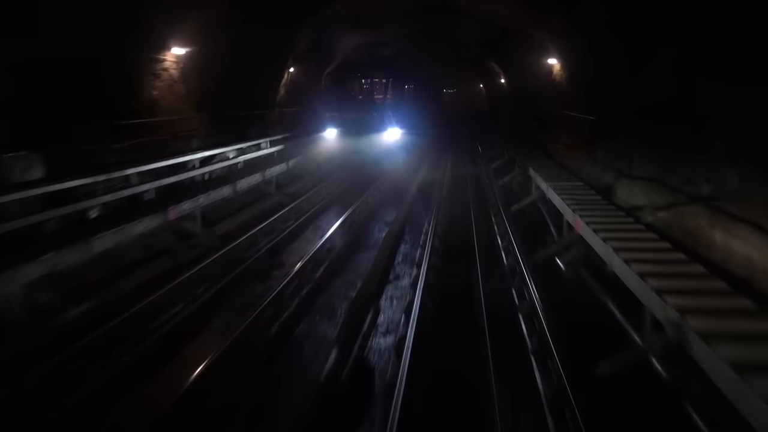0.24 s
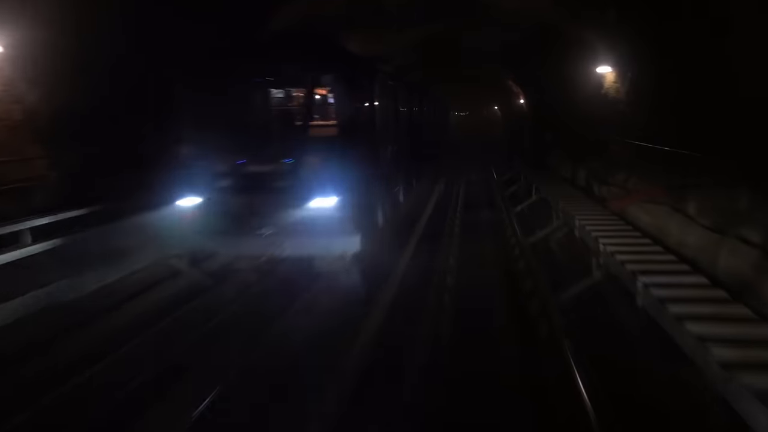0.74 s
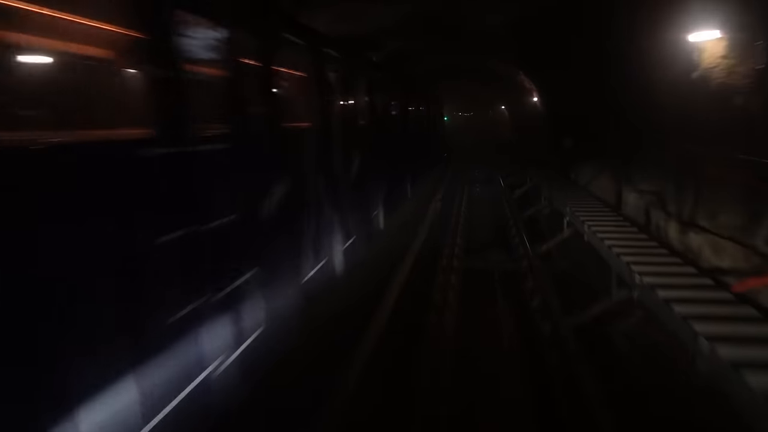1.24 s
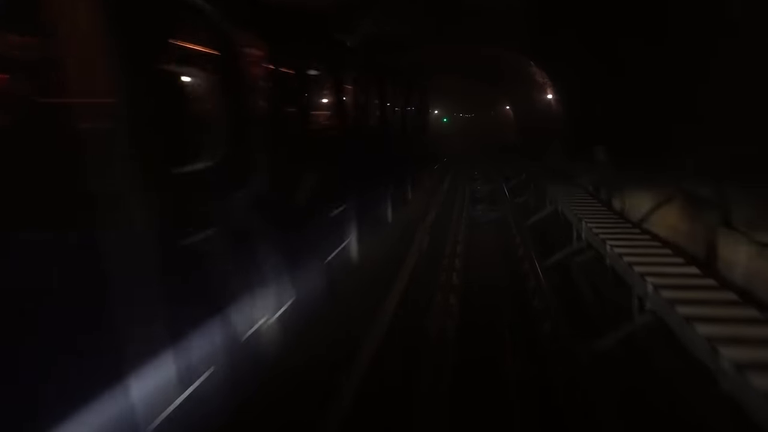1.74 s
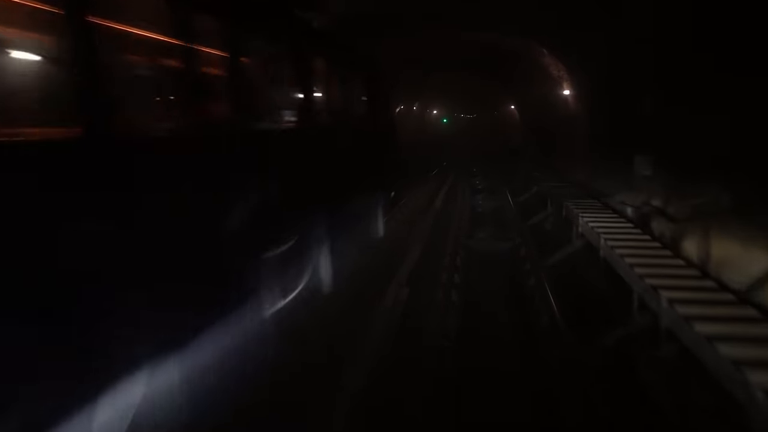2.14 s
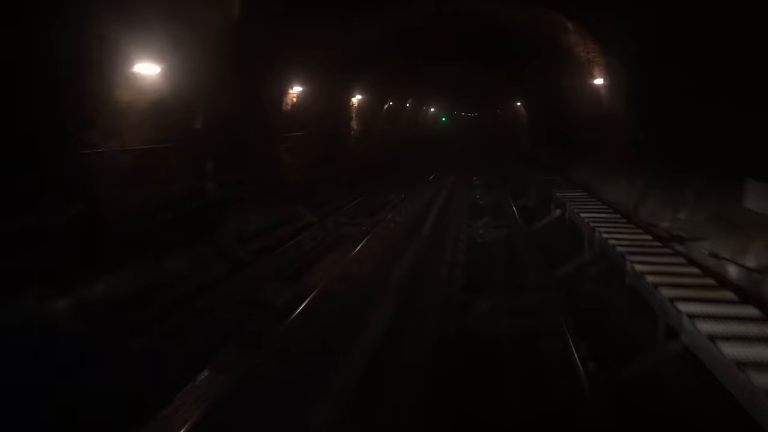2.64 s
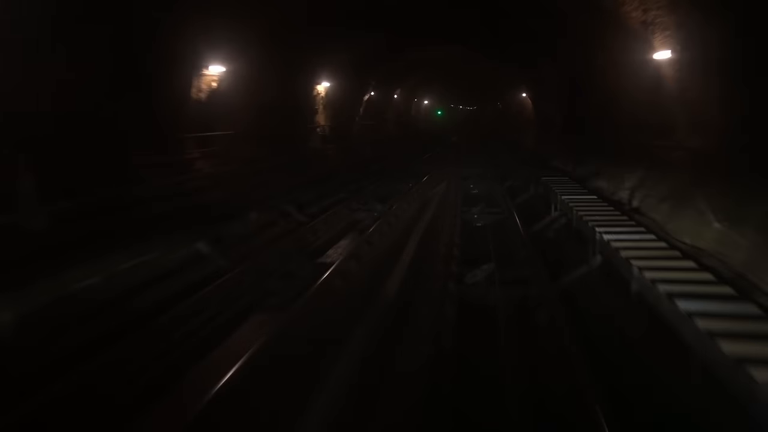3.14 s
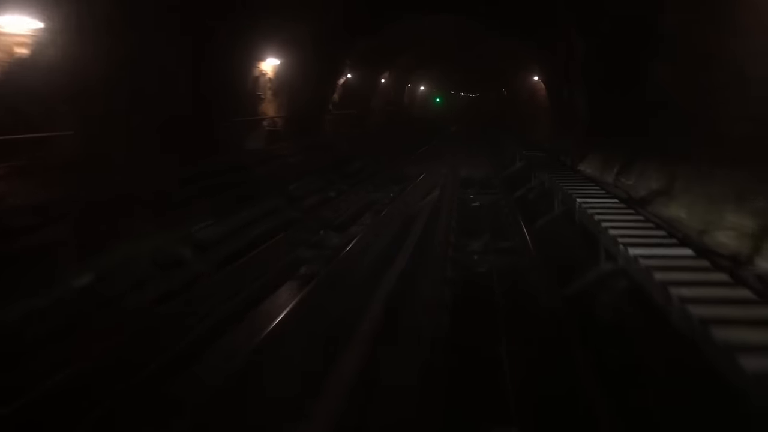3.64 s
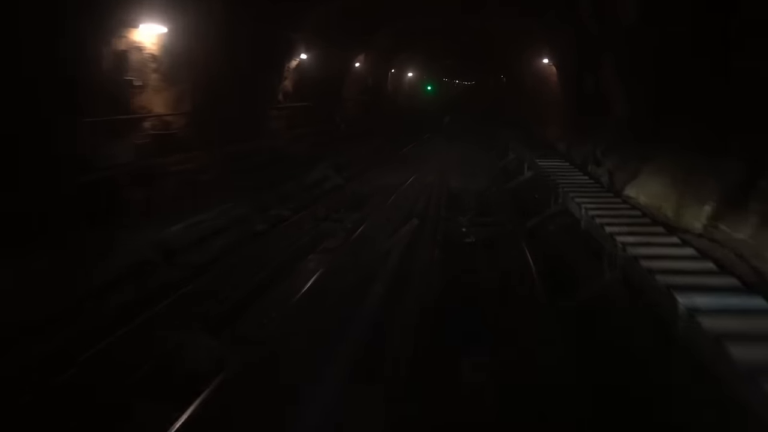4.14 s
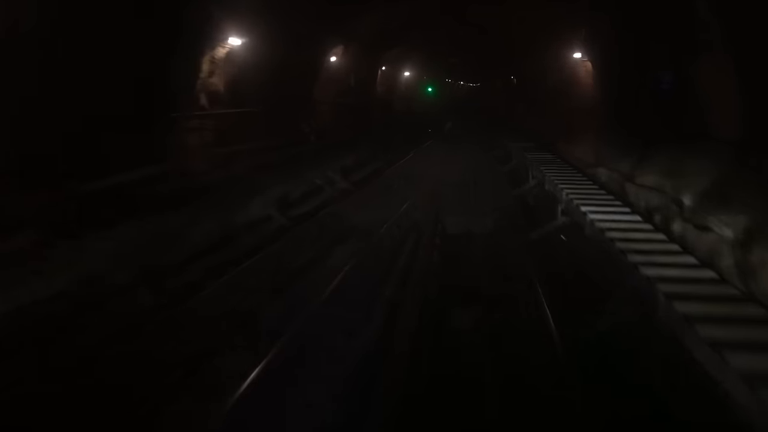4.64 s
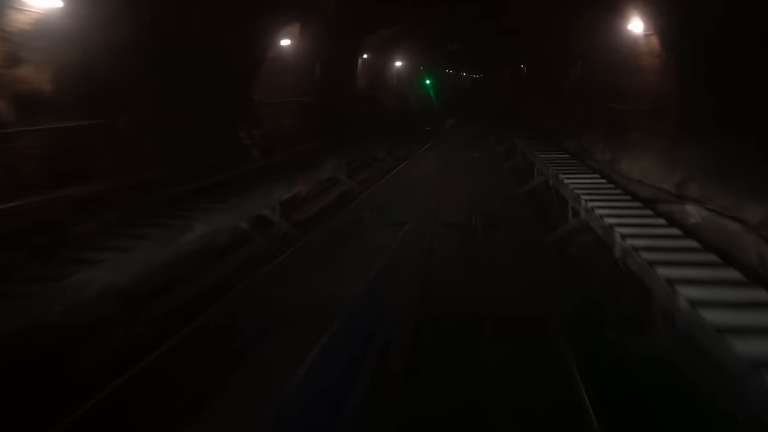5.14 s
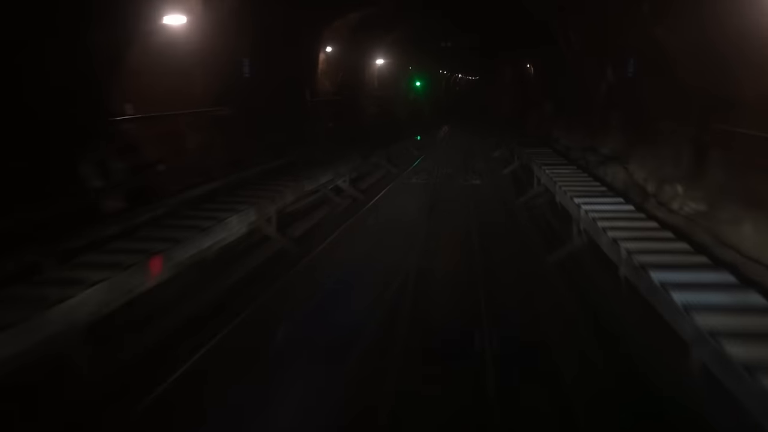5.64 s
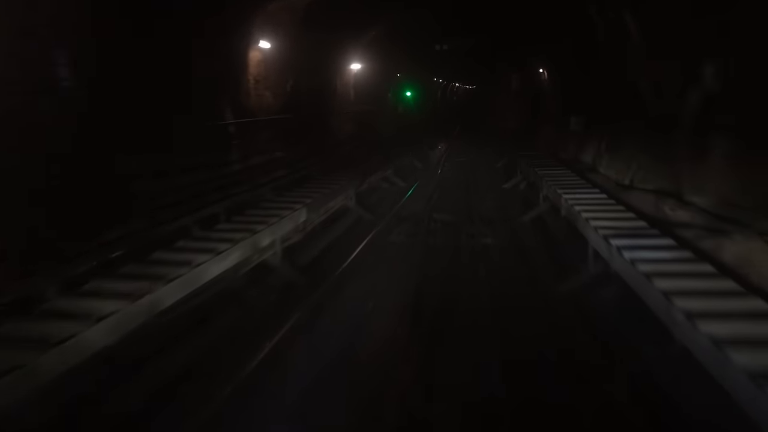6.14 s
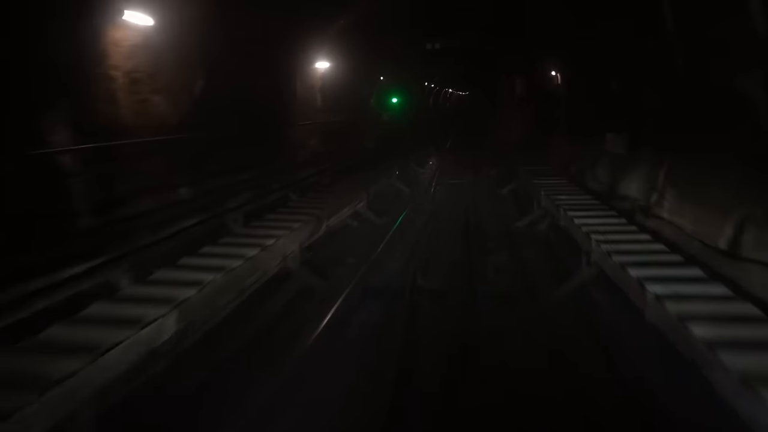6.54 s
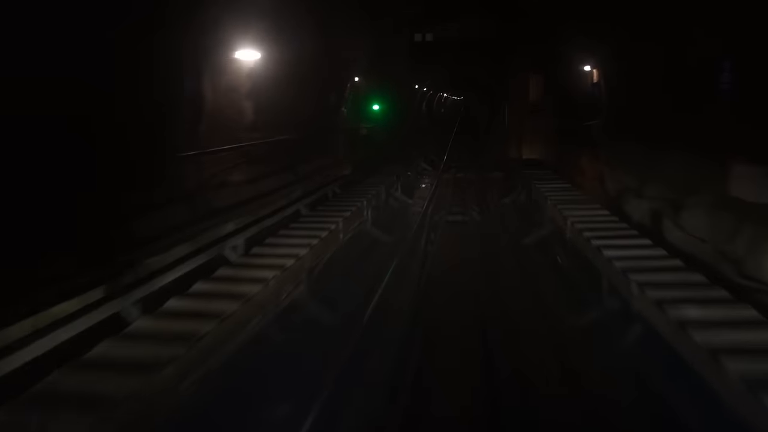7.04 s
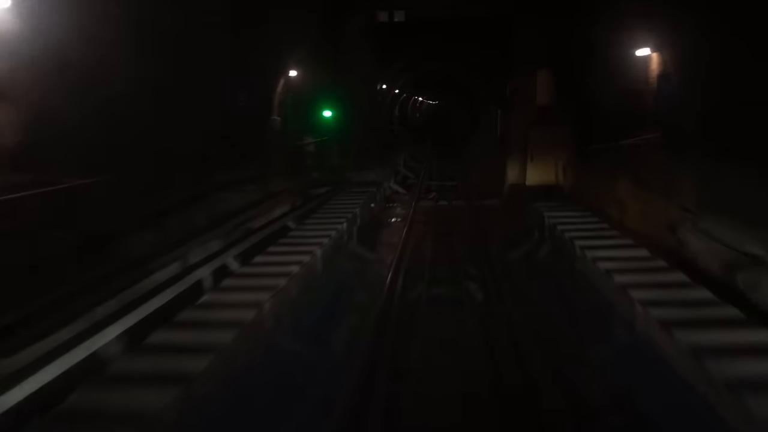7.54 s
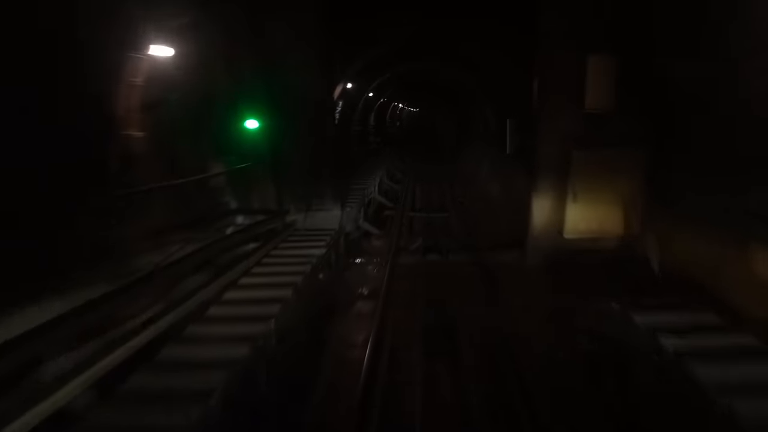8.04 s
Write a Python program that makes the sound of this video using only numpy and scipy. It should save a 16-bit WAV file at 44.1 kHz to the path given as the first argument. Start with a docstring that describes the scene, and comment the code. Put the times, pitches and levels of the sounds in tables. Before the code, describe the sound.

Inside a cable railway car rolling through a tunnel: steady low boom and floor drone, a wavering metallic whine above, and another car's ring passing.

```python
"""Inside a cable railway car rolling through a tunnel, heard by a stereo microphone pair behind the front window.
From the start, rail roughness shakes cabin air (boom), floor panels (drone) and wheels (a whine of close rings),
over a broad roar off the tunnel walls and a faint rustle near the microphones. Squeaks dot the first three seconds;
a second car's ring peaks at two seconds. From 3.4 s soft knocks ring the floor, and around 4 s the rustle thickens.
After 6.5 s the boom swells at times while the lower wheel rings sink back."""
import sys
import numpy as np
from scipy import signal
from scipy.fft import rfft, irfft, next_fast_len
from scipy.io import wavfile
from scipy.ndimage import uniform_filter1d, minimum_filter1d

SR = 44100
rng = np.random.default_rng(int(sys.argv[2]) if len(sys.argv) > 2 else 0)


def wav_out(sig):
    """Save sig, one row per channel (or a flat mono array), as 16-bit PCM at SR to the path in sys.argv[1]."""
    wavfile.write(sys.argv[1], SR, np.round(np.clip(np.atleast_2d(sig).T, -1, 1) * 32767).astype(np.int16))


N = 366030
SECONDS = np.arange(N) / SR
SIZE = next_fast_len(N, True)
BIN_HZ = np.fft.rfftfreq(SIZE, 1 / SR)

# Cabin and floor levels. Each row: time in seconds, then level in dB of the main boom, low cabin modes,
# high cabin modes, low floor panels, middle floor panels and high floor panels.
CABIN_LEVELS = [(0.0, -18, -20.5, -28, -29, -23.5, -31), (0.31, -20, -21.5, -28, -25.5, -22.5, -26),
                (0.61, -15, -22, -24.5, -26, -26.5, -31), (0.92, -27, -16.5, -27, -24, -26.5, -30),
                (1.23, -24.5, -23, -26.5, -34.5, -24, -26), (1.54, -15, -20.5, -21.5, -25.5, -27.5, -30),
                (1.84, -23, -23.5, -25.5, -24.5, -25.5, -30.5),
                (2.15, -18.5, -24, -28, -25.5, -24.5, -31.5),
                (2.46, -21.5, -28, -20.5, -28.5, -21.5, -27.5), (2.77, -23, -25.5, -24, -25.5, -21, -28.5),
                (3.07, -17.5, -24, -23, -23, -20.5, -30.5), (3.38, -20, -20.5, -32.5, -24.0, -20.5, -27),
                (3.69, -18, -22, -22, -22.5, -26.5, -28), (4.0, -23, -29.5, -23.5, -24.5, -19, -23),
                (4.3, -23.5, -25, -27.5, -22, -22.5, -23.5), (4.61, -21.0, -25, -22, -27, -22, -28.5),
                (4.92, -24, -25, -23.5, -23.5, -23.5, -28), (5.23, -26.5, -21.5, -25.5, -26.5, -21, -23.5),
                (5.53, -20, -22.5, -30.5, -22, -20.5, -23.5), (5.84, -20.5, -21, -28, -24, -21.5, -23),
                (6.15, -21.5, -23, -29.5, -25, -22, -24), (6.46, -10.5, -20, -25.5, -22.5, -20.5, -29.0),
                (6.76, -12, -22.5, -26, -27.5, -21, -25.5), (7.0, -13, -22, -21, -23, -24.5, -27.5),
                (7.18, -21.5, -23, -30, -27.5, -23.5, -29.5), (7.38, -18.5, -20, -25, -25, -26, -26),
                (7.58, -12.5, -12, -25, -24.5, -21.5, -27.5), (7.69, -16, -18, -22.5, -21.5, -18.5, -29),
                (7.75, -13, -19.5, -26, -25, -25.5, -28.5), (7.99, -12, -24, -24, -28.5, -27.5, -26),
                (8.3, -19, -22, -26.5, -21, -20, -21)]
# Resonances of cabin air, then floor panels. Each row: centre in Hz, width in Hz, relative peak height in dB.
BOOM_MODES = [(80.4, 9, 0.5), (69.2, 10, -4)]
CABIN_LOW_MODES = [(45, 27, -7), (58, 15, -2.5)]
CABIN_HIGH_MODES = [(107, 7.3, -2.5), (120.8, 11, -4.5)]
FLOOR_LOW_MODES = [(157.6, 8.4, 0), (179.8, 21.6, -2)]
FLOOR_MID_MODES = [(225, 14.4, -0.83), (252.2, 13.1, -0.18)]
FLOOR_HIGH_MODES = [(298, 18.4, -0.5), (324.5, 16, -9), (367.8, 20, -9), (507.5, 16, -17)]
BOOM_STEADY = 0.5  # 0 = free noise, 1 = even tone

# The car's own wheels. Each row: time in seconds, then level in dB of the lower ring, upper ring,
# side ring, first whine and high whine.
WHEEL_LEVELS = [(0.0, -23.5, -30, -39, -56, -61), (0.44, -32.0, -29, -36, -54, -57),
                (0.87, -26.5, -27.5, -36, -47, -61), (1.31, -25, -23, -34, -49, -59),
                (1.75, -28, -24.5, -35, -47, -56), (2.18, -22.5, -26, -38, -49.5, -62),
                (2.62, -24.5, -26, -37, -46.5, -50.5), (3.06, -25.5, -25.5, -42.5, -50.5, -56.5),
                (3.49, -30, -27.5, -38, -48, -49.5), (3.93, -29, -29, -38, -49.5, -53),
                (4.37, -25.5, -26.5, -35, -48, -56.5), (4.81, -25, -27, -33.5, -49, -62),
                (5.24, -21, -23.5, -33.5, -49.5, -55.5), (5.68, -24, -26.5, -37, -49, -59.5),
                (6.12, -24.5, -27, -35, -47.5, -58), (6.55, -36, -28, -40, -51, -58.5),
                (6.99, -32.5, -32.5, -39.5, -55, -59.5), (7.43, -36, -33, -35.5, -59.5, -59.5),
                (7.86, -42, -36.5, -39.5, -54, -60.5), (8.3, -32, -35, -34, -58, -59)]
# Wheel resonances, the second car's first. Each row: centre in Hz, width in Hz, relative peak height in dB.
PASSING_RING_MODES = [(872, 31, -8), (909.3, 30, 0), (947, 26, -2), (1850, 100, -30.5), (2570, 330, -39.5)]
LOWER_RING_MODES = [(967, 40, -0.5), (1013, 60, -6.5)]
UPPER_RING_MODES = [(1085, 35, -0.5), (1117, 52, -3)]
SIDE_RING_MODES = [(1256, 44, 0), (1331, 62, -1)]
WHINE_MODES = [(2150, 50, -3), (2190, 50, -0.5), (2280, 35, -7)]
HIGH_WHINE_MODES = [(3258, 76, 1), (3270, 54, -2), (3380, 61, -2.5), (2840, 42, -4.5), (4300, 55, -12),
                    (5240, 200, -12)]
RING_WAVER_DB, WHINE_WAVER_DB = 1.3, 1.9
# The second car's ring: time in seconds and level in dB of its peak, then the slopes either side.
PASS_S, PASS_DB, NEARING_DB_PER_S, LEAVING_DB_PER_S = 1.98, -18.5, 5, 3.5

# Flange squeaks. Each row: start in seconds, level in dB at the top of the swell.
SQUEAK_EVENTS = [(0.0782, -59), (.14, -63), (0.2205, -58), (0.3092, -61), (0.387, -61.5), (0.635, -62),
                 (1.09, -58), (1.33, -61), (1.5269, -64), (2.2, -58), (2.3905, -56.5), (2.55, -57),
                 (2.659, -60), (2.7237, -61), (2.8102, -58), (2.93, -60.5)]
SQUEAK_HZ, SQUEAK_WIDTH_HZ = 5290, 100
SQUEAK_RISE_S, SQUEAK_T60_S = 0.015, 0.3
# Longer thin rings. Each row: start in seconds, end in seconds, centre in Hz, width in Hz, level in dB.
# A row that ends before it starts stays silent.
THIN_RINGS = [(2, 3.3, 5270, 110, -67), (1.6, 4, 5300, 45, -71), (6.5, 7.37, 4340, 50, -65),
              (9, 8.3, 5300, 50, -74), (3, 8, 8377, 160, -81)]

# Dull knocks through the floor. Each row: start in seconds, peak in dB, pitch in Hz, push in seconds,
# hold in seconds, ring in seconds to fade 60 dB.
KNOCK_EVENTS = [(4.021, -15, 218.6, .04, .06, 0.5), (5.07, -17, 223, .04, .04, 0.4),
                (6.661, -14, 270, .022, 0.0028, 0.2), (7.63, -11, 300.4, 0.039, 0.044, 0.15),
                (6.85, -15.5, 252, 0.032, 0.0071, 0.3), (3.4, -14.5, 252, .022, 0, 0.84),
                (7.3, -19.5, 312, .03, .05, .15), (8.199, -21.5, 250, .022, .08, .5)]

# Tunnel roar. Each row: time in seconds, level of the low part in dB, level of the high part in dB.
ROAR_LEVELS = [(0, -28, -36), (.5, -30, -35), (1, -29, -34.5), (2, -31, -34.5), (2.4, -32, -33.5),
               (3.4, -29, -35.5), (3.85, -29.5, -34), (3.95, -24, -37), (4.1, -24.5, -35),
               (4.33, -22, -34.5), (4.45, -27.5, -34.5), (4.75, -27, -36.5), (5, -26.5, -37),
               (5.5, -26.5, -36.5), (6, -29.5, -36.5), (6.3, -30, -39.5), (6.6, -29.5, -40),
               (6.9, -32.5, -40.5), (7.1, -30.5, -41), (7.35, -30, -36.5), (7.5, -30.5, -39),
               (7.7, -31.5, -41), (8, -31.5, -38.5), (8.3, -31, -43)]
# Brief dips and lifts of the high part. Each row: centre in seconds, change in dB, half length in seconds.
ROAR_BUMPS = [(0.525, -4, .03), (4.115, -5, 0.032), (5.602, -2, .03), (6.152, 0, 0.017), (6.74, -7, 0.022),
              (6.89, -4.5, 0.03), (7.182, 2, .025), (7.62, 3, 0.024)]
# Spectral colours of the low part, high part and airy top. Each row: frequency in Hz, relative dB per Hz.
LOW_ROAR_COLOUR = [(20, -1), (40, -1), (140, 0.5), (330, -0.5), (400, 6.5), (600, 5), (710, 6.5), (780, 3),
                   (1200, -11.5), (1500, -23), (3000, -61), (6000, -100)]
HIGH_ROAR_COLOUR = [(700, -17), (1200, -8), (1500, -5.5), (2030, -18), (2370, -19), (2600, -18),
                    (3030, -24), (3300, -22), (3600, -26), (4000, -31), (4300, -32.5), (4560, -35),
                    (5100, -33.5), (5600, -35), (6000, -46), (7000, -49), (9000, -55.5), (16000, -83.5)]
AIR_COLOUR = [(5000, -20), (9000, -3), (12000, -1), (16000, 0)]
# Weak modes riding on the high part. Each row: centre in Hz, width in Hz, relative peak height in dB.
OVERTONE_MODES = [(1590, 35, -1), (4340, 78, -15.5), (4810, 66, -14), (6360, 340, -21.5), (7700, 400, -29),
                  (10500, 300, -37)]
OVERTONES_DB, AIR_DB = -22.5, -41  # relative to the high roar

# Rustle bed. Each row: time in seconds, level in dB.
RUSTLE_LEVELS = [(0, -67), (.8, -79.5), (2.9, -76), (3.6, -61.5), (4.15, -60.5), (4.66, -59), (4.74, -63.5),
                 (5.4, -67.5), (6.15, -67), (6.3, -75), (7.1, -70.5), (7.6, -72.5), (7.86, -70),
                 (7.92, -83), (8.3, -80)]
# Spectral colour of rustle and ticks. Each row: frequency in Hz, relative dB per Hz.
RUSTLE_TONE = [(3000, -20), (6000, -1), (8000, 1), (10300, 0), (11500, -3), (12500, 0), (16000, -1)]
# Patches of busier rustle. Each row: centre in seconds, top level in dB, rise and fall time in seconds.
RUSTLE_PATCHES = [(0.299, -69, .035), (.46, -65, .025), (1.91, -67, 0.039), (2.58, -69.5, .02),
                  (3.85, -68, 0.038), (4.32, -57, 0.053), (4.45, -62, 0.034), (4.59, -59, 0.035),
                  (5.05, -62, .02), (5.28, -72.5, .015), (6.11, -73, .01), (6.69, -60.5, 0.027),
                  (6.82, -68.5, .022), (7.26, -71, .008), (7.366, -70, 0.038), (7.52, -72, .03)]
# Ticks near the microphones. Each row: start in seconds, starting level in dB, left minus right in dB.
TICK_EVENTS = [(0.8955, -64, -8), (2.4924, -62, -9), (3.1015, -61, -3), (3.5387, -51, 2), (3.7865, -53, -5),
               (3.8488, -51.5, -2), (4.877, -61, -16), (5.533, -54, -13), (5.6112, -56, -3),
               (5.7959, -55, 2), (5.8992, -52, -8), (5.928, -58, -3), (5.962, -60, -3), (6.0184, -51, -1),
               (6.033, -49, -3), (6.117, -56, -3), (6.3, -59, -3), (6.387, -60, -3), (6.4015, -55, 4),
               (7.681, -48, -3)]
TICK_T60_S = 0.014
SNAPS_PER_S, SNAP_SCATTER_DB, SNAP_DB = 200, 5, -6  # SNAP_DB is relative to the fine crackle

# Stereo width of the pair. Each row: frequency in Hz, side minus mid in dB.
STEREO_WIDTH = [(40, -26), (80, -18), (180, -13.5), (300, -10), (380, -9.5), (700, -9.3), (1300, -9.3),
                (2400, -5), (4400, 0), (8000, .3), (15000, .3)]
# Stereo tilt of the pair. Each row: frequency in Hz, left minus right in dB.
STEREO_TILT = [(60, -1), (200, -.5), (400, -.2), (800, -1), (1500, -1), (2500, -2.4), (4500, -5.5),
               (8000, -3), (15000, -3)]
LEFT_LAG_S = 3e-5
CEILING_DB, TOP_HZ, EDGE_S = -2.3, 15700, 0.012


def cabin():
    """Rail roughness drives the boom of the cabin air and the drone of the floor panels."""
    # modes, waver in dB, steadiness
    layers = [(BOOM_MODES, 0.33, BOOM_STEADY), (CABIN_LOW_MODES, 0.55, BOOM_STEADY),
              (CABIN_HIGH_MODES, 0.41, 0), (FLOOR_LOW_MODES, 0.91, 0),
              (FLOOR_MID_MODES, 1.4, 0), (FLOOR_HIGH_MODES, 1.2, 0)]
    levels = curves(CABIN_LEVELS)
    return sum(undb(db) * body(modes, waver_db, 4.0, steady)
               for db, (modes, waver_db, steady) in zip(levels, layers))


def wheels():
    """Close wheel resonances make the whine, one set from the second car; higher modes sing faintly."""
    lower_db, upper_db, side_db, whine_db, high_whine_db = curves(WHEEL_LEVELS)
    since = SECONDS - PASS_S
    passing_db = PASS_DB - np.maximum(-NEARING_DB_PER_S * since, LEAVING_DB_PER_S * since)
    rings = [(passing_db, PASSING_RING_MODES), (lower_db, LOWER_RING_MODES),
             (upper_db, UPPER_RING_MODES), (side_db, SIDE_RING_MODES)]
    whines = [(whine_db, WHINE_MODES), (high_whine_db, HIGH_WHINE_MODES)]
    ringing = sum(undb(db) * body(modes, RING_WAVER_DB, 6.0) for db, modes in rings)
    whining = sum(undb(db) * body(modes, WHINE_WAVER_DB, 12.0) for db, modes in whines)
    return ringing + whining


def squeaks():
    """A wheel flange rasps briefly on one high mode; thin rings come and go for longer spells."""
    rasp = unit(ring(SQUEAK_HZ, SQUEAK_WIDTH_HZ, 1.5, 40.0))
    rasp_level = sum(swell(s, db, SQUEAK_T60_S, SQUEAK_RISE_S) for s, db in SQUEAK_EVENTS)
    thin = 0
    for start, end, hz, width_hz, db in THIN_RINGS:
        fade = np.clip(np.minimum(SECONDS - start, end - SECONDS) / 0.06, 0, 1)
        thin = thin + undb(db) * fade * unit(ring(hz, width_hz, 2.5, 12.0))
    return rasp * rasp_level + thin


def knocks():
    """Soft blows from the track each ring one floor panel as a fading sine."""
    return sum(swell(s, db, t60, push, hold) * np.sin(2 * np.pi * hz * (SECONDS - s))
               for s, db, hz, push, hold, t60 in KNOCK_EVENTS)


def tunnel_roar():
    """Broad noise returns from the tunnel walls: a low part, and a high part with weak modes and air."""
    low_db, high_db = curves(ROAR_LEVELS)
    for s, change_db, half_s in ROAR_BUMPS:
        high_db = high_db + change_db * np.exp(-((SECONDS - s) / half_s) ** 2)
    low = roar(LOW_ROAR_COLOUR, 1.0)
    overtones = undb(OVERTONES_DB) * body(OVERTONE_MODES, 2.0, 8.0)
    air = undb(AIR_DB) * roar(AIR_COLOUR, 1.1)
    high = roar(HIGH_ROAR_COLOUR, 1.4) + overtones + air
    return undb(low_db) * low + undb(high_db) * high


def rustle():
    """Dense tiny crackles and sparser snaps modulate bright noise, in patches, with a few lone ticks."""
    fine = unit(undb(2.6 * rng.exponential(size=N) + 1.2 * walk(16)))
    snap_hits = rng.random(N) < SNAPS_PER_S / SR
    snaps = unit(snap_hits * undb(SNAP_SCATTER_DB * rng.standard_normal(N)))
    crackle = rustle_noise(fine + undb(SNAP_DB) * snaps)
    ticks = 0
    for s, db, pan_db in TICK_EVENTS:
        decay = (SECONDS >= s) * 1000.0 ** (-np.abs(SECONDS - s) / TICK_T60_S)
        ticks = ticks + np.outer(undb([db + pan_db / 2, db - pan_db / 2]), decay)
    patches = sum(undb(db) / np.cosh(np.clip((SECONDS - s) / half_s, -30, 30))
                  for s, db, half_s in RUSTLE_PATCHES)
    return (undb(curves(RUSTLE_LEVELS)[0]) + patches) * crackle + ticks * rustle_noise(1)


def rustle_noise(grain):
    """Stereo noise roughened by a grain envelope, then given the rustle's colour."""
    return unit(wave(rfft(wave(roughness()) * grain, SIZE) * gains(RUSTLE_TONE)))


def body(modes, waver_db, rate, steady=0):
    """A set of resonances, each shaken on its own, summed to rms 1."""
    return unit(sum(undb(db) * ring(hz, width_hz, waver_db, rate, steady) for hz, width_hz, db in modes))


def ring(hz, width_hz, waver_db, rate, steady=0):
    """One steep resonance shaken by noise; its strength wavers, and steadiness evens out its own swells."""
    # this scaling puts the half-power width close to width_hz
    detune = (BIN_HZ - hz ** 2 / (BIN_HZ + 1e-9)) / (1.5 * width_hz)
    x = unit(wave(roughness() / (1 + detune ** 2)))
    if steady:
        power = uniform_filter1d(np.mean(x ** 2, axis=0), size=int(SR / width_hz / 4))
        x = unit(x / (power + 0.05) ** (steady / 2))
    # a wider mode carries more energy at the same peak height
    return x * np.sqrt(width_hz) * undb(waver_db * walk(rate))


def roar(colour, flicker_db):
    """Coloured noise in overlapping octave slices that flicker partly together, partly alone."""
    spectrum = roughness() * gains(colour)
    together = walk(6.5)
    octave = np.log2(BIN_HZ + 1)
    total = 0
    for k in range(4, 16):
        part = wave(spectrum * np.maximum(1 - np.abs(octave - k), 0))
        total = total + part * undb(flicker_db * (0.4 * together + walk(10)))
    return unit(total)


def roughness():
    """Noise spectra at both microphones: alike in bass, unrelated in treble, stronger and earlier at right."""
    a, b, c, d = rng.standard_normal((4, len(BIN_HZ)))
    mid = a + 1j * b
    side = (c + 1j * d) * gains(STEREO_WIDTH)
    half_tilt = np.sqrt(gains(STEREO_TILT))
    lag = np.exp(-2j * np.pi * BIN_HZ * LEFT_LAG_S)
    return np.array([(mid + side) * half_tilt * lag, (mid - side) / half_tilt])


def swell(s, db, t60, rise, hold=0):
    """An envelope that rises over the push, holds, then fades by 60 dB in t60 seconds."""
    t = np.maximum(SECONDS - s, 0)
    attack = np.sin(np.pi / 2 * np.minimum(t / rise, 1)) ** 2
    return undb(db) * attack * 1000.0 ** (-np.maximum(t - rise - hold, 0) / t60)


def walk(rate):
    """Random levels, held 1 / rate seconds and smoothed twice; spread near 1."""
    k = int(SR / rate)
    steps = np.repeat(rng.standard_normal(N // k + 1), k)
    return 1.22 * uniform_filter1d(uniform_filter1d(steps, k), k)[:N]


def wave(spectrum):
    """Turn a spectrum back into samples."""
    return irfft(spectrum, SIZE)[:, :N]


def gains(points):
    """Gain on every frequency bin, drawn through (Hz, dB) points on a log frequency axis."""
    hz, db = np.transpose(points)
    return undb(np.interp(np.log(BIN_HZ + 1), np.log(hz + 1), db))


def curves(table):
    """Columns of a timed table, drawn as one value a sample."""
    s, *columns = np.transpose(table)
    return [np.interp(SECONDS, s, column) for column in columns]


def unit(x):
    """Scale to rms 1."""
    return x / np.sqrt(np.mean(x ** 2))


def undb(db):
    """Gain of a level in dB."""
    return 10 ** (np.asarray(db) / 20)


def scene():
    """Sum of everything that reaches the two microphones."""
    return cabin() + wheels() + squeaks() + knocks() + tunnel_roar() + rustle()


def record(dry):
    """Both ends fade in a blink, a quick limiter holds most peaks, then the top is cut steeply."""
    to_edge = np.minimum(SECONDS, SECONDS[-1] - SECONDS)
    dry = dry * np.sin(np.pi / 2 * np.clip(to_edge / EDGE_S, 0, 1))
    peak = np.abs(dry).max(axis=0) + 1e-9
    need = np.minimum(1, undb(CEILING_DB) / peak) ** 1.1
    gain = uniform_filter1d(minimum_filter1d(need, size=882), size=882)  # 20 ms windows
    low_pass = signal.ellip(11, 0.1, 40, TOP_HZ, fs=SR, output="sos")
    return signal.sosfiltfilt(low_pass, dry * gain)


dry = scene()
out = record(dry)
wav_out(out)
```